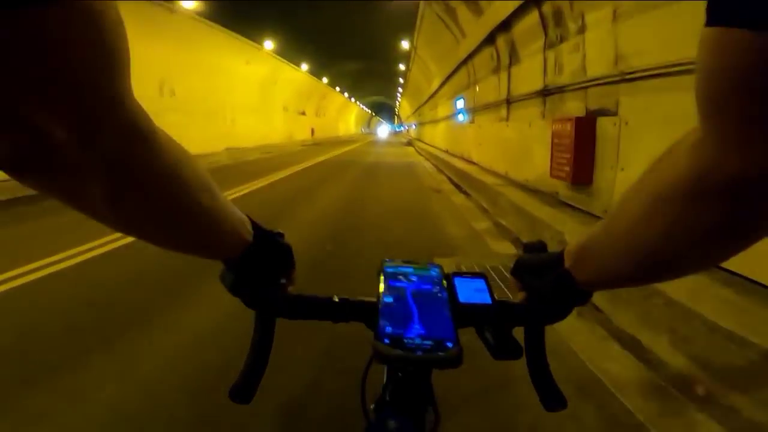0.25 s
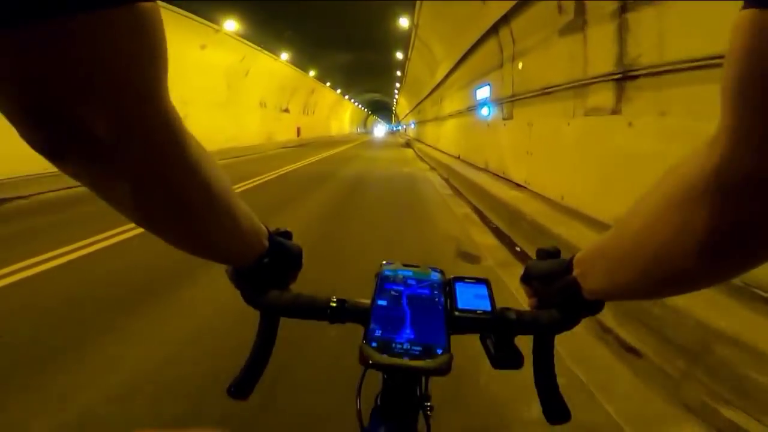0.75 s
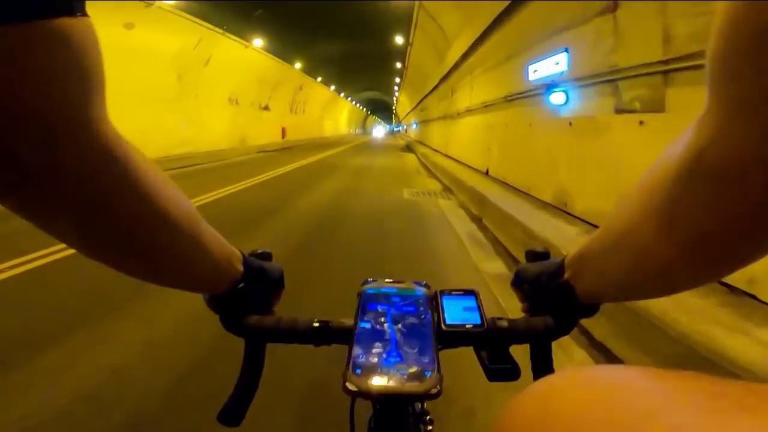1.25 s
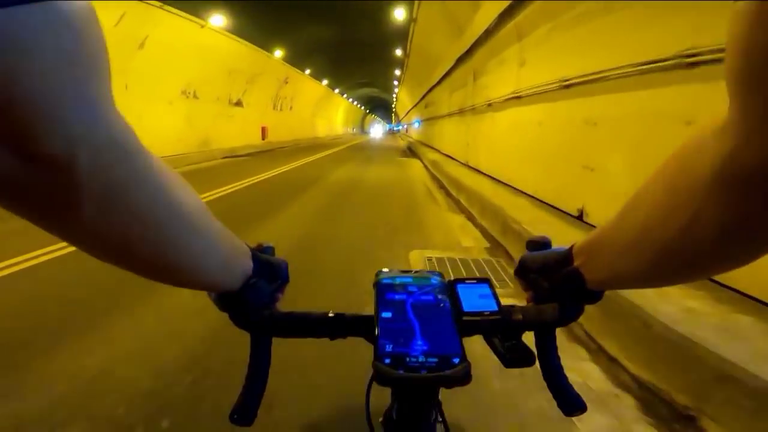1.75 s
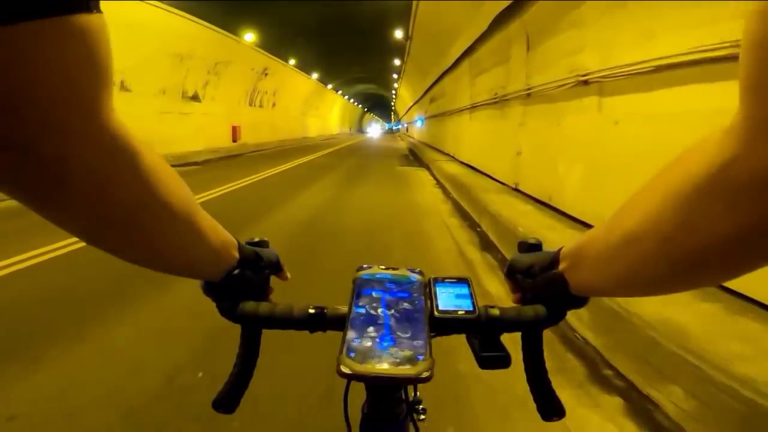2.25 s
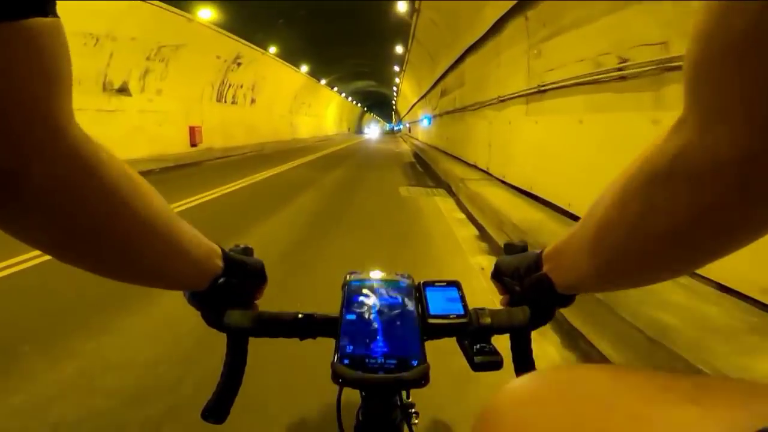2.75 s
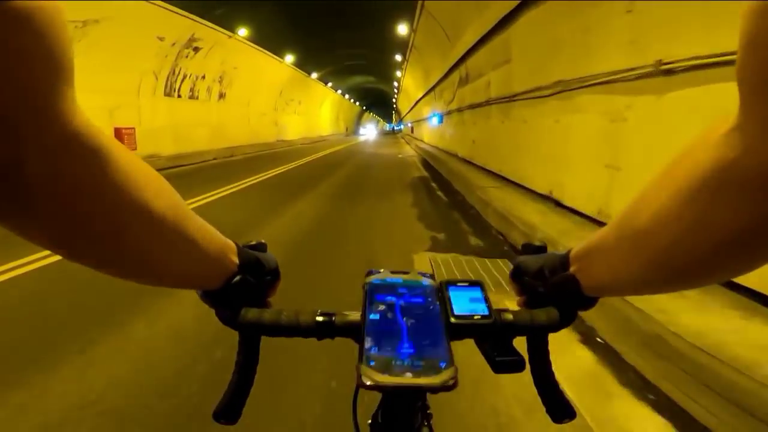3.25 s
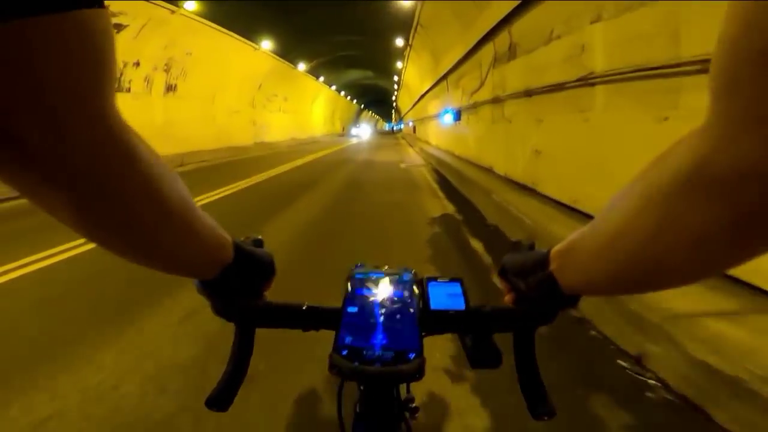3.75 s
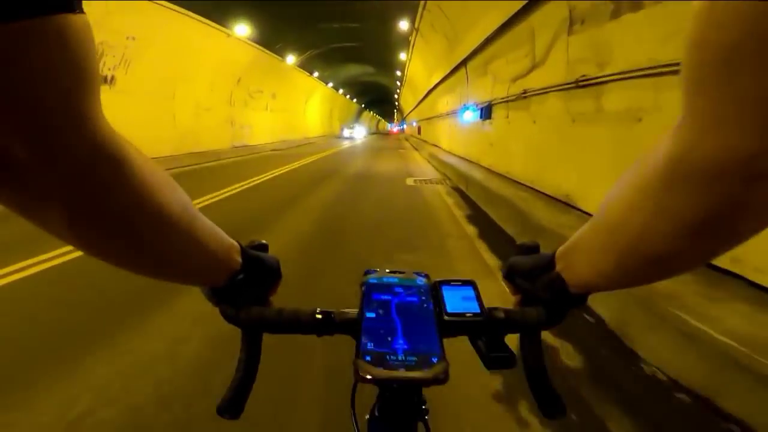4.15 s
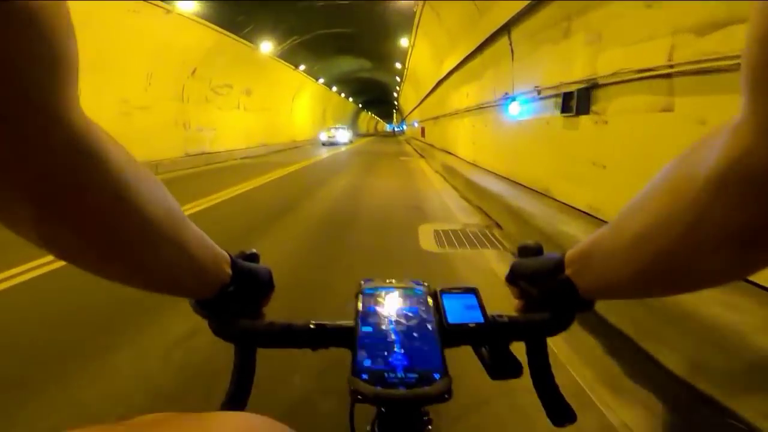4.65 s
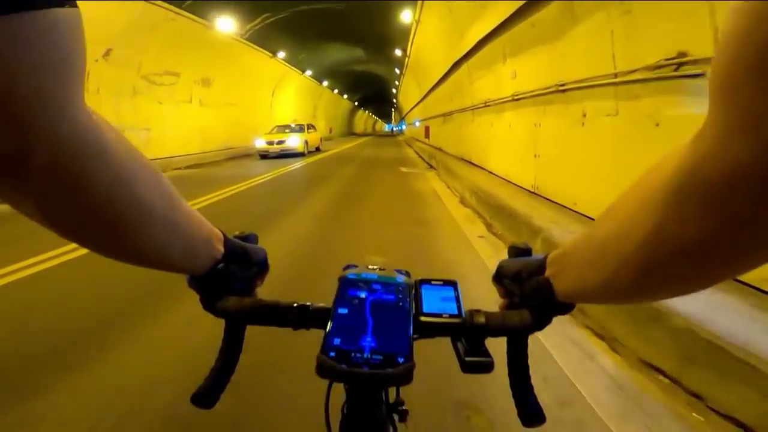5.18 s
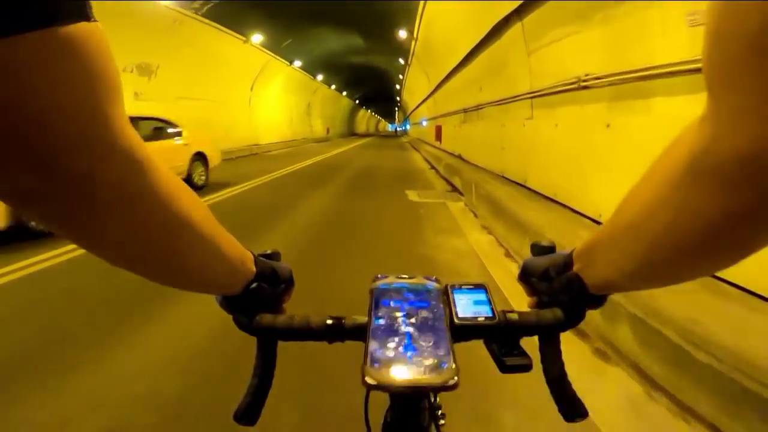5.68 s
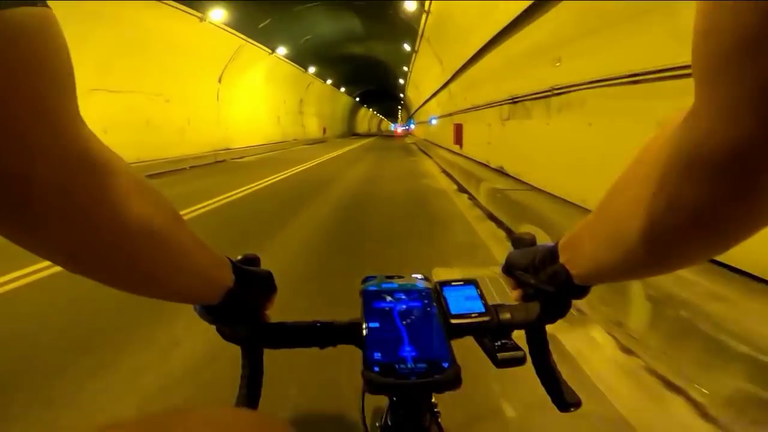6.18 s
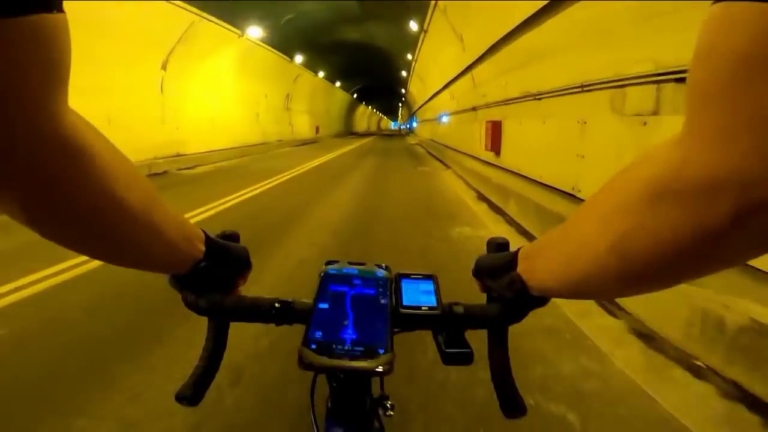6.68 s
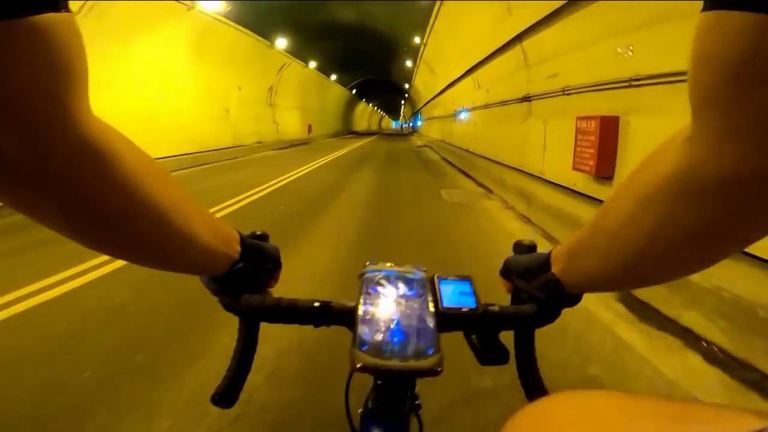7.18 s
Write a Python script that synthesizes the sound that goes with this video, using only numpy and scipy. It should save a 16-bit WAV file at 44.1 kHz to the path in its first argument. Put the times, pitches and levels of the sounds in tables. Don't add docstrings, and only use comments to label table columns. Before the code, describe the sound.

For about 7.4 seconds, loud wind rushes over a stereo microphone on a cyclist's chest in a road tunnel. Deep buffeting and broad flutter differ between left and right. On the left, rough low howls bend briefly upward with pedal strokes, notably around 0.3-0.5, 1.3, 2.0, 2.8, 3.7, 5.1 and 6.5-7.4 seconds. Heavier left buffets push in around 1.75, 2.35, 3.25 and 5.8, and again at the end. A steady, hollow tyre-and-traffic roar lies underneath, slightly brighter near 5.5, swelling and leaning right around 6.15, then dulling at the close. A very faint chain and spoke hiss sits on top. After gusts, the upper sound abruptly dips and recovers in about a tenth of a second, strongest near 4.7 and 5.0, with a cluster around 6.4-6.9. The wind never stops.

```python
import sys
import numpy as np
from scipy import signal
from scipy.fft import rfft, irfft
from scipy.io import wavfile
from scipy.ndimage import uniform_filter1d, minimum_filter1d

SR = 44100
rng = np.random.default_rng(int(sys.argv[2]) if len(sys.argv) > 2 else 0)


def decibels_to_gain(level_db):
    exponent = np.asarray(level_db, float) / 20
    return 10 ** exponent


def wav_record(signal):
    frames = np.transpose(np.atleast_2d(signal))
    bounded = np.clip(frames, -1, 1)
    quanta = np.round(bounded * 32767).astype(np.int16)
    wavfile.write(sys.argv[1], SR, quanta)


N = 327222
HZ = np.fft.rfftfreq(N, 1 / SR) + 1e-3


def rms_one(x):
    return x / np.sqrt(np.mean(x ** 2) + 1e-20)


def in_time(rows):
    s, *columns = np.transpose(rows)
    return [np.interp(np.arange(N) / SR, s, c) for c in columns]


def at_hz(rows, hz):
    f, *columns = np.transpose(rows)
    return [np.interp(np.log(hz), np.log(f), c) for c in columns]


def swells(s, length_s, height):
    t = np.arange(0, N + 64, 64) / SR
    total = 0
    for centre_s, width_s, h in zip(s, length_s, height):
        total = total + h * np.cos(np.pi * np.clip((t - centre_s) / width_s, -.5, .5)) ** 2
    return np.interp(np.arange(N) / SR, t, total)


def drift(rate_hz):
    r = np.exp(-80 * np.pi * rate_hz / SR)
    noise = rng.standard_normal(N // 40 + 2002)
    slow = signal.lfilter([1], [1, -2 * r, r * r], noise)[2000:]
    return np.interp(np.arange(N) / 40, np.arange(len(slow)), rms_one(slow))


def evened(x, even_s, evenness):
    width = int(even_s * SR)
    level = uniform_filter1d(uniform_filter1d(rms_one(x) ** 2, width), width)
    return rms_one(x / (level + .02) ** (evenness / 2))


def eddies(colour, even_s, evenness):
    spectrum = rfft(rng.standard_normal(N)) * decibels_to_gain(at_hz(colour, HZ)[0])
    inside = (HZ < 2 * colour[-1][0]) * (HZ > colour[0][0] / 2)
    return evened(irfft(spectrum * inside, N), even_s, evenness)


def howl(hz):
    width_hz = 37.7
    r = np.exp(-np.pi * width_hz / SR)
    spread = signal.lfilter([1], [1, -2 * r, r * r], rng.standard_normal((2, N)))
    turn = 2 * np.pi * np.cumsum(hz * (1 + .09 * drift(8.0))) / SR
    carried = spread[0] * np.cos(turn) + spread[1] * np.sin(turn)
    tone = evened(carried, even_s=0.042, evenness=0.48)
    return rms_one(tone * decibels_to_gain(2.1 * drift(5.9)))


# (time [s], level [dB])
LEFT_AIR = [(0, -17), (.45, -17), (.72, -18.5), (1.3, -18), (1.75, -13), (1.9, -19), (2.35, -12),
            (2.68, -16.5), (3.25, -12.5), (3.47, -18.5), (3.83, -15), (4.0, -13.5), (4.7, -18), (5.3, -18),
            (5.66, -22), (5.8, -14.5), (6.75, -22), (7.42, -13.5)]
# (frequency [Hz], density [dB per Hz])
LEFT_BUFFET_COLOUR = [(6, -7), (15, -1.5), (30, -4), (45, -4), (75, -6.5), (110, -7), (160, -16.5),
                      (300, -28.5)]
# (frequency [Hz], density [dB per Hz])
FLUTTER_COLOUR = [(60, -13), (100, 0), (130, -4.5), (200, -2.5), (300, 0), (450, -8.5), (800, -22.5),
                  (1500, -40.5)]
# (time [s], length [s], howl rise [dB], top pitch [Hz], shelter of the right port [dB])
STROKES = [(.28, 0.19, 10, 184, 0), (0.471, 0.32, 6.5, 245, 7), (0.881, 0.32, 4, 261, -4),
           (1.282, 0.54, 7.5, 239.4, 2), (1.649, 0.37, 3.5, 229.2, -1), (1.966, .25, 7, 178.1, 1.5),
           (2.071, 0.2205, 5.5, 212.8, 5), (2.282, .2, 3, 160.2, 3.5), (2.783, .2, 7.5, 225, 2),
           (2.92, 0.16, 1.5, 200.3, 4), (3.077, 0.2176, 5.5, 175, -0.5), (3.649, .26, 8.5, 210.6, 2.5),
           (3.799, .15, 6.5, 170, 1), (4.028, .25, 3, 270, -2.5), (4.382, 0.33, 3, 264.7, 0.5),
           (5.12, 0.36, 5, 205, 4), (5.35, .2, 2, 185, -1), (5.78, .25, 4, 250.6, -2),
           (6.54, 0.37, 6, 220, 7), (6.68, 0.2014, 3.5, 239.7, 7), (6.87, .25, 6, 219.6, 9),
           (7.266, 0.27, 5, 187.5, 1), (7.41, .2, 8, 270, 7)]


def left_port_wind():
    rest_db, rest_hz, wander = -16.0, 175, .12
    second_edge_hz = 205
    s, length_s, rise_db, top_hz, _ = np.transpose(STROKES)
    howl_db = rest_db + swells(s, length_s, rise_db)
    gust_db = howl_db - np.mean(howl_db)
    swing = np.clip(swells(s, length_s, np.ones(len(s))), 0, 1)
    howl_hz = rest_hz * (1 + wander * (1 - swing) * drift(3.0))
    howl_hz = howl_hz + swells(s, length_s * .6, top_hz - rest_hz)
    second_hz = second_edge_hz * 2 ** (.3 * drift(2.5))

    buffet = eddies(LEFT_BUFFET_COLOUR, even_s=0.082, evenness=0.73)
    flutter = eddies(FLUTTER_COLOUR, even_s=0.12, evenness=0.39)
    left = decibels_to_gain(in_time(LEFT_AIR)[0] - 0.3) * buffet
    left += decibels_to_gain(howl_db + 0.15 * gust_db - 2.5) * howl(howl_hz)
    left += decibels_to_gain(howl_db + 0.077 * gust_db - 6.5) * howl(second_hz)
    left += decibels_to_gain(howl_db - 0.28 * gust_db - 2.5) * flutter
    return left


# (frequency [Hz], density [dB per Hz])
RIGHT_BUFFET_COLOUR = [(6, -21), (15, -2), (30, -3.5), (50, -2.5), (80, -5.5), (110, -10), (160, -13),
                       (300, -46.5)]


def right_port_wind():
    buffet_db, flutter_db = -12, -21.0
    gust_s, gust_per_duck = 0.11, 0.74
    s, length_s, _, _, shelter_db = np.transpose(STROKES)
    clamp_s, depth_db, _ = np.transpose(DUCKS)
    buffet_db = buffet_db - swells(s, length_s, shelter_db)
    gust_lengths = np.full(len(clamp_s), gust_s)
    flutter_db = flutter_db + swells(clamp_s - .02, gust_lengths, gust_per_duck * depth_db)

    right = decibels_to_gain(buffet_db + 0.65) * eddies(RIGHT_BUFFET_COLOUR, even_s=0.33, evenness=0.19)
    right += decibels_to_gain(flutter_db + 2.5) * eddies(FLUTTER_COLOUR, even_s=0.018, evenness=0.57)
    return right


# (time [s], level [dB], brightness [dB], left over right [dB])
ROAR = [(0.0, -21.5, -1.5, -.5), (.3, -17.5, -2, 1), (.7, -19, -1.5, 1), (1.15, -19, 1, .8),
        (1.55, -18, 1.5, 1), (2.1, -20, 1.5, 0.5), (2.35, -18.5, 3, 1.5), (3.2, -20, 3, 0.6),
        (3.9, -19.5, 2, .6), (4.6, -18.5, 0.5, 0.3), (4.9, -20, 2.5, 0), (5.15, -19, 2.5, 0.5),
        (5.5, -20, 5.5, 0.5), (6.15, -16.5, -2, -2), (6.38, -19, 0, -2), (6.6, -22, -2.5, -1),
        (7.1, -21, 2, -3), (7.42, -17.5, -8, -1.5)]
# (frequency [Hz], density [dB per Hz])
ROAR_COLOUR = [(150, -9), (300, -2.5), (480, 1), (700, -1.5), (1000, 0.5), (1300, -5), (1700, -9.5),
               (2800, -19), (4500, -27.5), (6500, -35), (7700, -39), (8100, -44), (9000, -67)]
# (frequency [Hz], likeness [0-1], left lead [rad], left over right [dB])
PORTS = [(300, .9, 1.2, 1.0), (600, .78, .95, .6), (1100, .78, .75, -.4), (1700, .75, .4, -.4),
         (2600, .73, .8, -2.5), (3500, .58, .95, -3.5), (4400, .33, .95, -3.5), (5600, .03, .95, -2.5),
         (8600, .03, 3.0, -.8), (10500, .24, 3.0, -.8)]
# (frequency [Hz], share of duck [0-1], share of brightness [0-1], flicker [dB])
RESPONSE = [(300, 0.11, 0.76, 2.9), (905, 0.74, 0.21, 0.7), (1870, 0.94, 1, 0.68), (4000, 1.0, 0.97, 0.98),
            (7500, 0.89, 0.54, 0.7)]


def tunnel_roar(duck_db):
    level_db, bright_db, pan_db = in_time(ROAR)
    alike, lead, tilt_db = at_hz(PORTS, HZ)
    alike = np.clip(alike, 0, 1)
    shared, own = rfft(rng.standard_normal((2, N)))
    left = shared * decibels_to_gain(tilt_db / 2)
    right = (alike * shared + np.sqrt(1 - alike ** 2) * own) * np.exp(-1j * lead) * decibels_to_gain(-tilt_db / 2)
    pair = np.array([left, right]) * decibels_to_gain(at_hz(ROAR_COLOUR, HZ)[0])
    pair = pair * (HZ > 80) * (HZ < 15000)

    together = drift(16.0) + .7 * drift(25.0)
    out = 0
    for k in range(13):
        centre_hz = 150 * 2 ** (k / 2)
        octaves = np.log2(HZ / centre_hz)
        band = np.cos(np.pi / 2 * np.clip(2 * octaves, -1, 1)) ** 2
        duck, bright, flicker_db = at_hz(RESPONSE, centre_hz)
        flicker = .8 * together + .9 * drift(15.0)
        gain_db = duck * duck_db + bright * bright_db + flicker_db * flicker
        out = out + decibels_to_gain(gain_db) * irfft(pair * band, N)
    sides = np.array([[.5], [-.5]])
    return decibels_to_gain(level_db + 2.5 + pan_db * sides) * rms_one(out)


# (frequency [Hz], density [dB per Hz])
HISS_COLOUR = [(7600, -33), (8200, -2), (9000, -1), (10300, -1.5), (11200, -5.5), (12200, -12.5),
               (13600, -14), (14700, -32)]


def chain_hiss(duck_db):
    level_db, duck_share, bright_share = -54.5, 0.88, 0.38
    pair = [eddies(HISS_COLOUR, even_s=.1, evenness=0) * decibels_to_gain(1.1 * drift(6.0)) for port in range(2)]
    bright_db = in_time(ROAR)[1]
    return decibels_to_gain(level_db + bright_share * bright_db + duck_share * duck_db) * np.array(pair)


# (time [s], depth [dB], recovery [s])
DUCKS = [(0.0, 0, 0.059), (0.35, 8.5, 0.17), (.47, 4.5, 0.08), (0.844, 11, 0.067), (.96, 5, 0.02),
         (1.241, 8, 0.22), (1.625, 0.5, 0.043), (1.906, 8, 0.03), (1.98, 6.5, 0.25), (2.391, 9.5, 0.064),
         (2.601, 5.5, 0.095), (2.674, 7.5, 0.035), (3.23, 2.5, 0.051), (3.662, 7, 0.066),
         (4.186, 10.5, 0.057), (4.375, 1.5, 0.14), (4.706, 17, 0.043), (4.99, 11, 0.11), (6.146, 3, 0.041),
         (6.429, 3, .12), (6.48, 4.5, .15), (6.565, 10.5, 0.038), (6.645, 4.5, 0.076), (6.743, 9, 0.06),
         (6.884, 7, 0.046), (7.307, 1, 0.1)]


def wind_filter():
    attack_s = .006
    build_share, build_s = 0.083, 0.21
    t = np.arange(0, N, 16) / SR
    clamps = 0
    for s, depth_db, back_s in DUCKS:
        away_s = np.abs(t - s)
        build = build_share * np.exp(-away_s / build_s)
        recovery = -np.exp(-away_s / back_s)
        clamps = clamps + depth_db * np.where(t < s, build, recovery)
    attack = np.exp(-16 / (attack_s * SR))
    return np.interp(np.arange(N) / SR, t, signal.lfilter([1 - attack], [1, -attack], clamps))


# (frequency [Hz], share kept [0-1])
KEPT = [(3000, 1), (4700, .95), (5700, .86), (6900, .6), (7700, .4), (8300, .13), (10000, .16),
        (11200, .07), (12500, .05), (14500, .01)]


def thinned(x):
    turn = np.array([[1, 0.92], [1, -1.02]]) / np.sqrt(2)
    padded = np.pad(turn @ x, [(0, 0), (0, 4096)], "reflect", reflect_type="odd")
    hz, _, cells = signal.stft(padded, SR, "cosine", nperseg=2048, boundary="odd")
    power = np.abs(cells) ** 2
    around = uniform_filter1d(uniform_filter1d(power, size=33, axis=1), size=3, axis=2)
    luck = uniform_filter1d(rng.standard_normal((2, 129, cells.shape[2])), size=2, axis=2)
    luck = np.repeat(luck, 8, axis=1)[:, :len(hz)]
    bar = -np.log(at_hz(KEPT, hz + 1)[0])[:, None] * decibels_to_gain(6.0 * luck)
    strong = cells * (power >= bar * around)
    return turn @ signal.istft(strong, SR, "cosine", nperseg=2048)[1][:, :N]


def scene():
    duck_db = wind_filter()
    wind = np.array([left_port_wind(), right_port_wind()])
    ducked_wind = decibels_to_gain(0.14 * duck_db) * wind
    return ducked_wind + tunnel_roar(duck_db) + chain_hiss(duck_db)


def band_limit(x):
    return signal.sosfilt(signal.butter(12, 15100, fs=SR, output="sos"), x)


def record(dry):
    hold = int(.004 * SR)
    needed = np.minimum(1, 1.02 / (np.abs(dry) + 1e-9))
    held = minimum_filter1d(needed, 2 * hold + 1)
    gain = uniform_filter1d(uniform_filter1d(held, hold), hold)
    from_end = np.minimum(np.arange(N), np.arange(N)[::-1])
    edges = np.sin(np.pi / 2 * np.clip(from_end / 100, 0, 1)) ** 2
    mix = edges * np.clip(thinned(dry * gain), -1, 1)
    return band_limit(mix)


dry = scene()
out = record(dry)
wav_record(out)
```